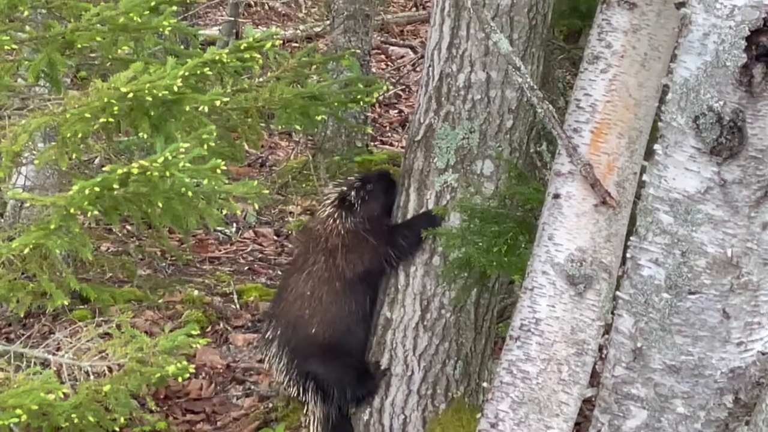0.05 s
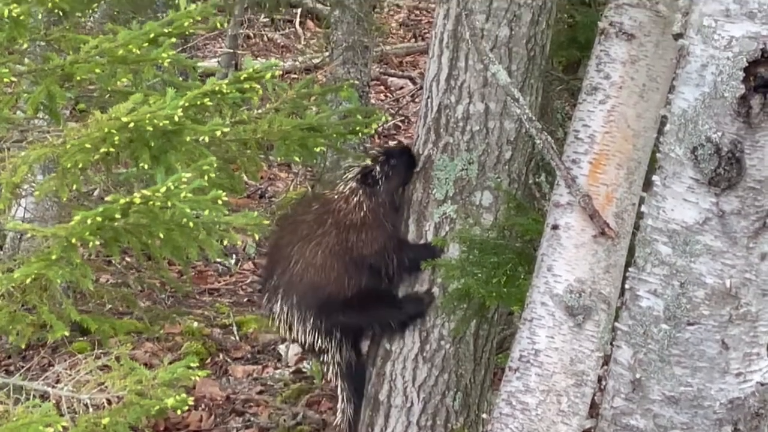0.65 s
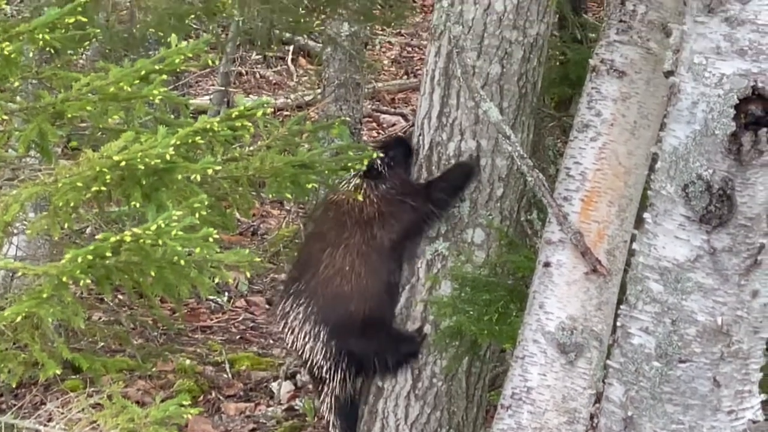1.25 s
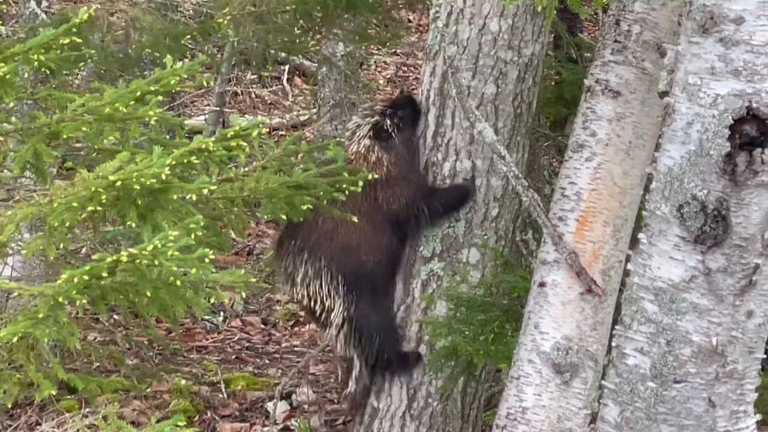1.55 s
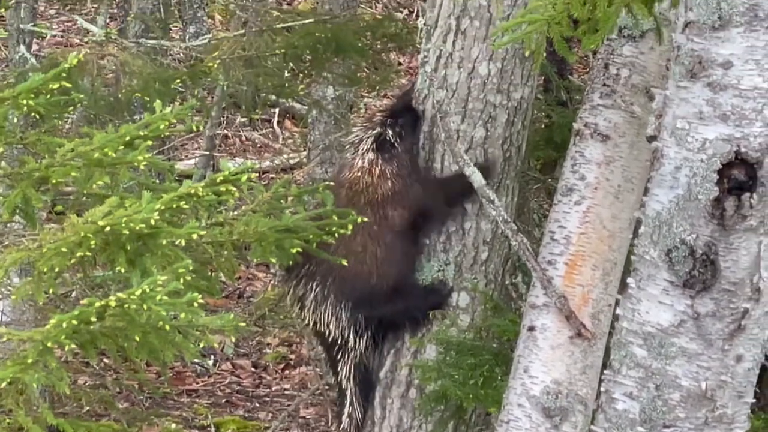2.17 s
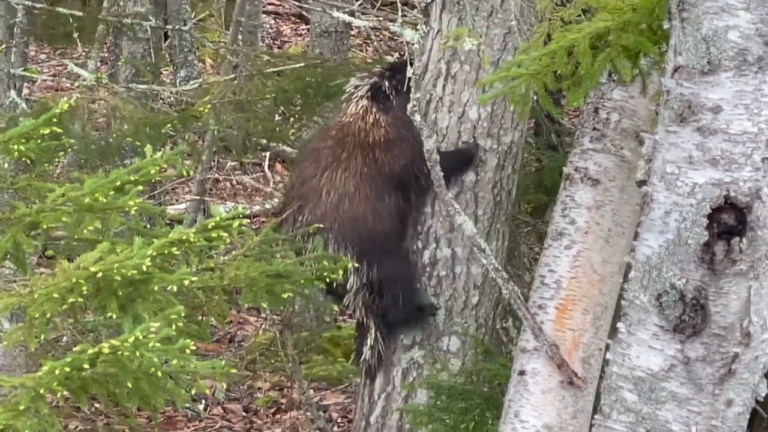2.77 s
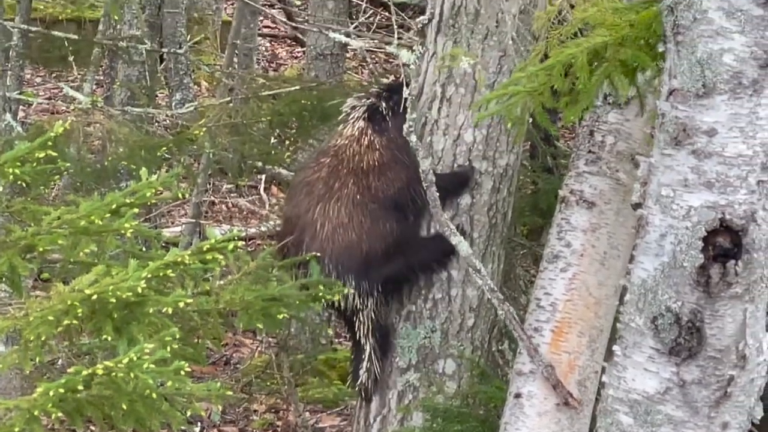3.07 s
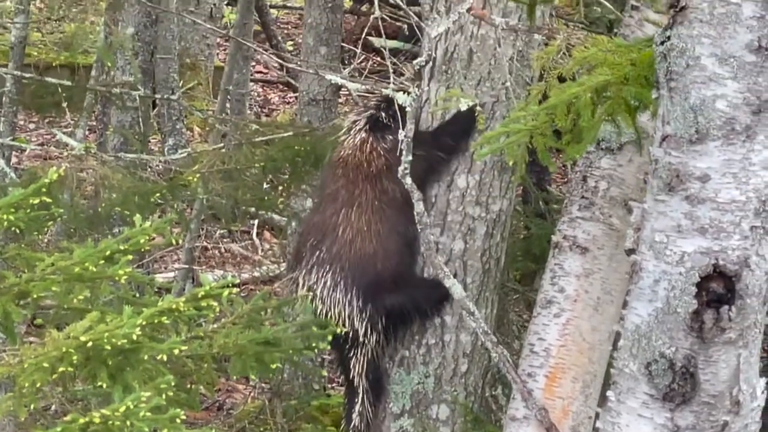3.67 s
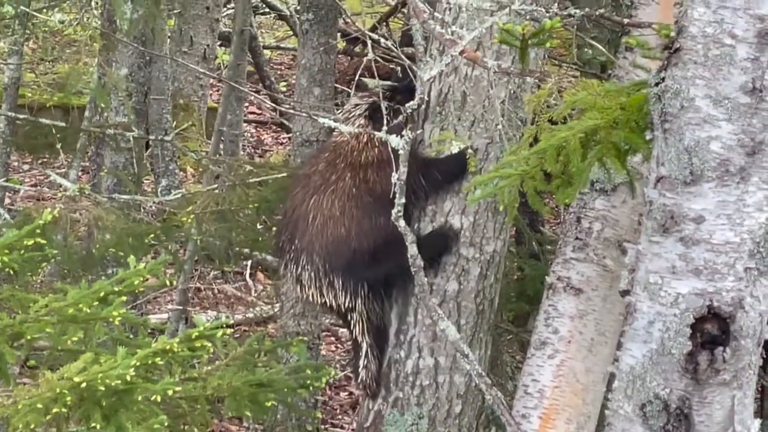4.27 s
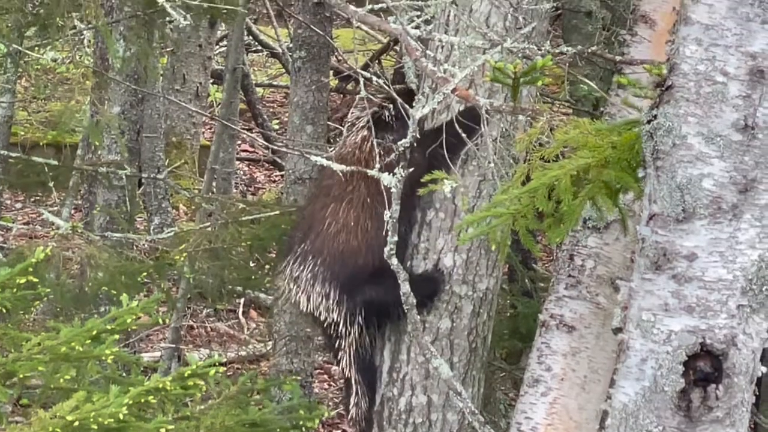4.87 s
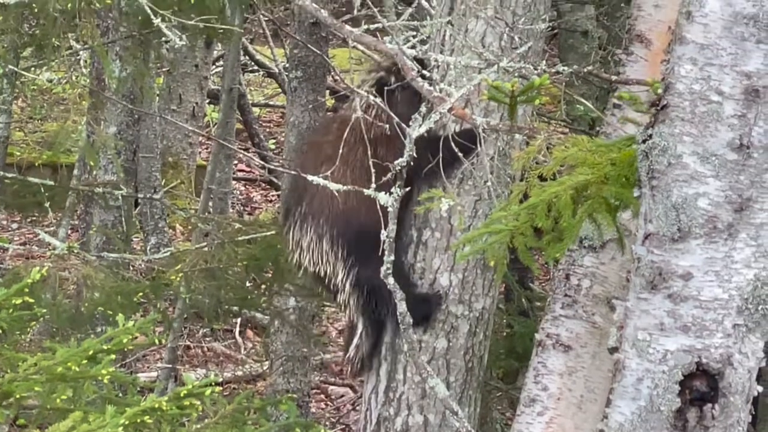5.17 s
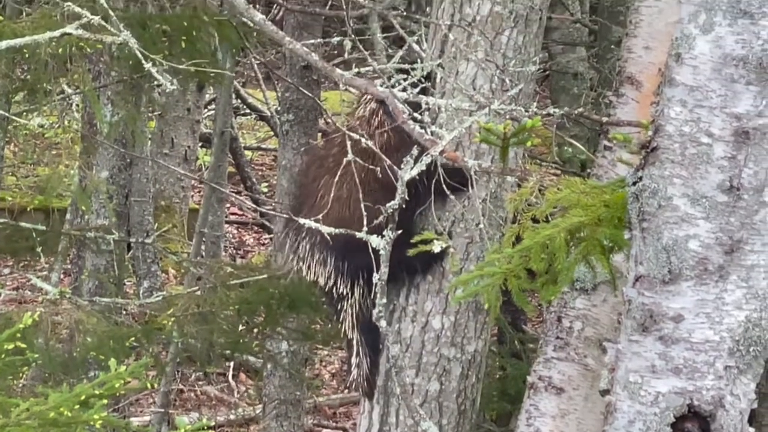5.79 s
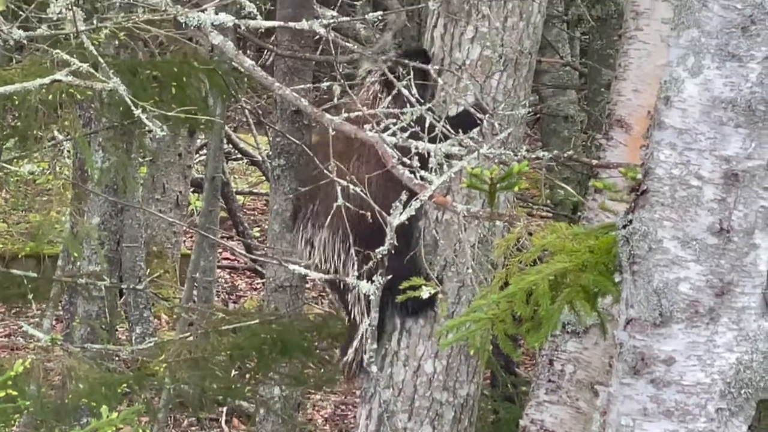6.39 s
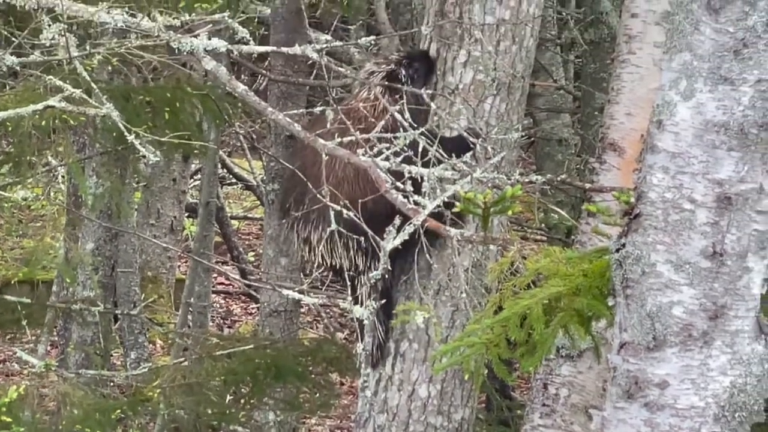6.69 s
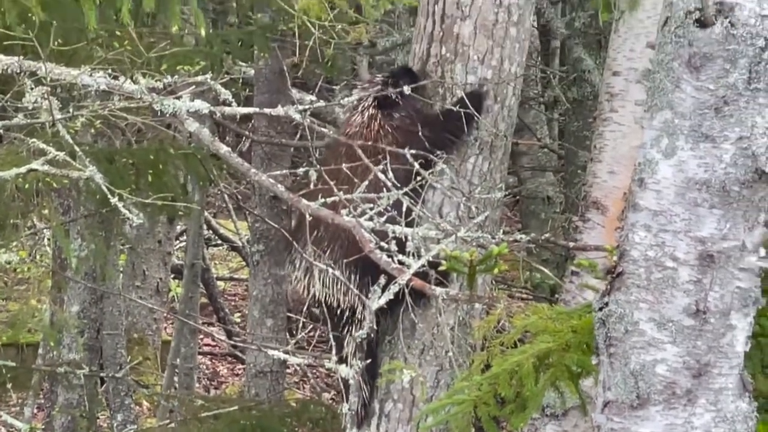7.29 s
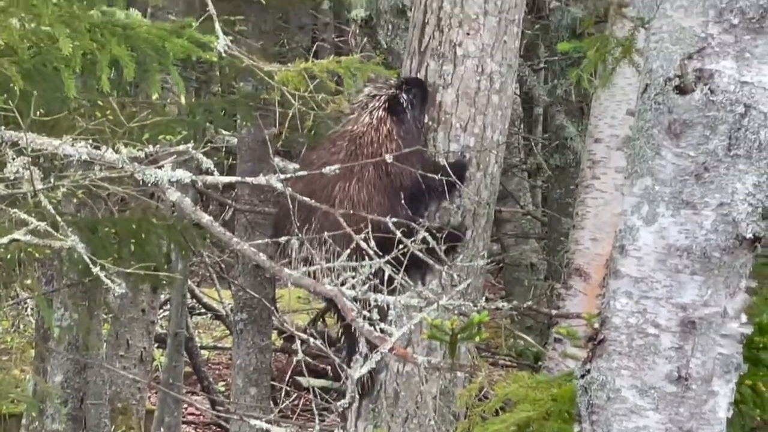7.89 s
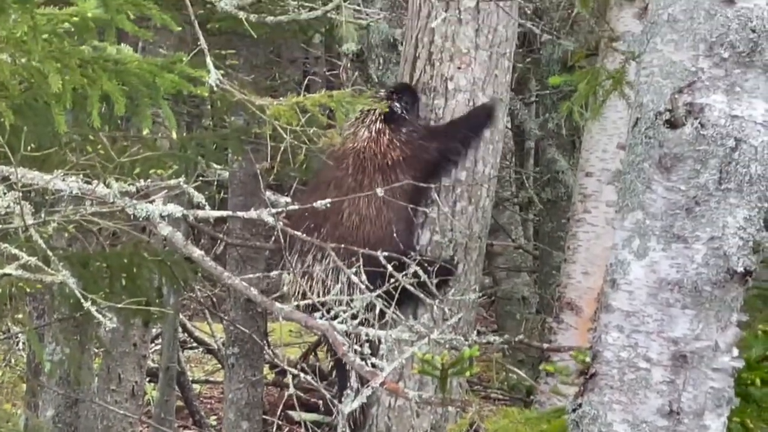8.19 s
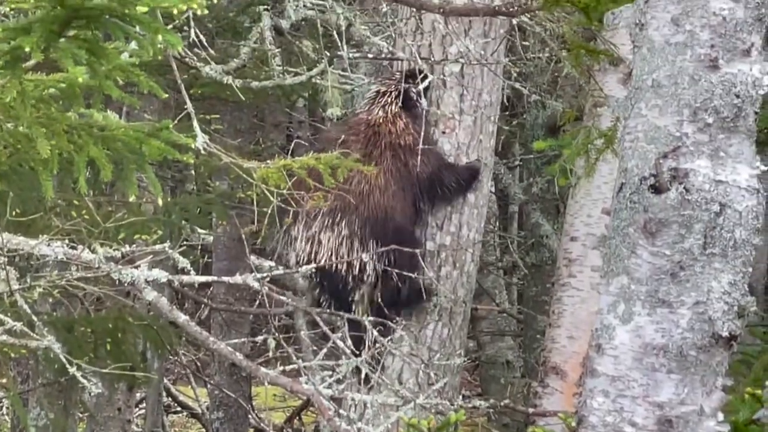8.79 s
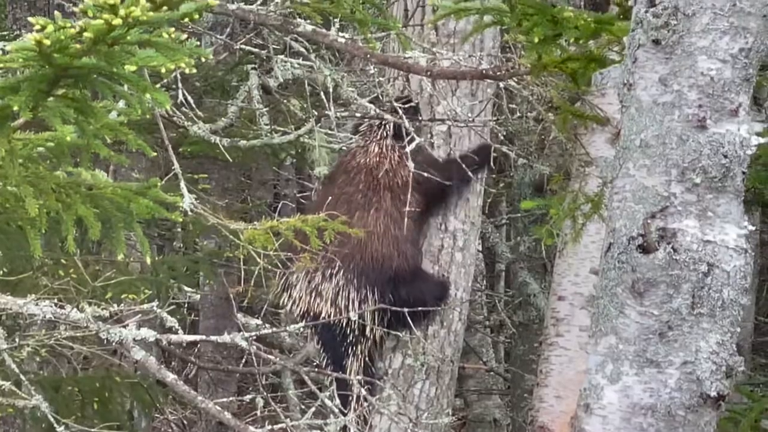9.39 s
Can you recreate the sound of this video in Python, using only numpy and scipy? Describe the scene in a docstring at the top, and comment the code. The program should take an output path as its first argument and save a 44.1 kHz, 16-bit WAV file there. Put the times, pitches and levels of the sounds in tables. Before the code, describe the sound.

Light gusts rumble on the microphone while an animal climbs a trunk with small dry bark cracks, twig ticks and one stick snap.

```python
"""First you hear a soft hiss and the low, fluttering rumble of light gusts on the microphone. Over it a
porcupine climbs a rough trunk: its claws crack off flakes of bark and rake over the ridges, its quills rustle,
and thin dry twigs tick. Late on, a dead stick snaps. The trees scatter each of these climbing sounds into a
short tail, except for the twigs' faintest ticks. The hiss and the rustle grow louder in the second half."""
import sys
import numpy as np
from scipy import signal
from scipy.fft import rfft, irfft
from scipy.io import wavfile
from scipy.ndimage import uniform_filter1d

SR = 44100
rng = np.random.default_rng(int(sys.argv[2]) if len(sys.argv) > 2 else 0)


def wrap_up_sound(samples):
    """Save the sound to the file named by the first command line argument, as 16-bit audio."""
    columns = np.atleast_2d(samples).T
    # keep every value between -1 and 1, then stretch to whole-number steps
    tamed = np.clip(columns, -1, 1)
    steps = np.round(tamed * 32767).astype(np.int16)
    wavfile.write(sys.argv[1], SR, steps)


N = 416744
TIME = np.arange(N) / SR
FREQ = np.fft.rfftfreq(N, 1 / SR)


def undb(db):
    """Turn decibels into a number to multiply by."""
    return 10 ** (np.asarray(db) / 20)


def unit(x):
    """Scale a sound to an average strength (rms) of 1."""
    return x / np.sqrt(np.mean(x ** 2))


def curve(table):
    """Join (time, value) points with straight lines: one value for every sample."""
    return np.interp(TIME, *np.transpose(table))


def gains(points, freq):
    """Read off how much (frequency, level) points boost or cut each given frequency."""
    hz, db = np.transpose(points)
    return undb(np.interp(np.log(freq + 1), np.log(hz), db))


def colour(x, points):
    """Shape a sound's tone to follow (frequency, level) points."""
    cepstrum = irfft(np.log(gains(points, FREQ)), N)
    # folding this in half makes the filter ring after a click, not before it
    cepstrum[1:N // 2] *= 2
    cepstrum[N // 2 + 1:] = 0
    return irfft(rfft(x) * np.exp(rfft(cepstrum)), N)


def add(track, s, sound):
    """Mix a sound into a track, starting at s seconds."""
    start = max(int(s * SR), 0)
    track[..., start:start + sound.shape[-1]] += sound[..., :N - start]


def wander(per_s):
    """A line that drifts at random, usually by about 1 either way."""
    knots = rng.standard_normal(4096)
    return np.interp(TIME * per_s, np.arange(len(knots)), knots) * np.sqrt(3 / 2)


def grains(per_s, spread_db):
    """Tiny clicks at random moments, a few much louder than the rest."""
    clicks = (rng.random(N) < per_s / SR) * rng.choice([-1, 1], N)
    return unit(clicks * undb(spread_db * rng.standard_normal(N).clip(-2, 2)))


# tone of the fine hiss: (frequency [Hz], level [dB])
HISS_TONE = [(150, 15), (500, 8), (1000, 4), (2200, 1.5), (4200, -2.5), (5800, -9), (7200, -3.5),
             (8700, -10), (11000, -9.5), (13000, -8), (15500, -20)]
# tone of far wind in the treetops: (frequency [Hz], level [dB])
TREETOP_TONE = [(70, -14), (200, -32), (450, 0), (700, -2.5), (1100, -9.5), (1800, -21), (4000, -93)]
# how the hiss grows louder; faint ticks follow it, the quills half as much: (time [s], gain [dB])
SWELL = [(3.4, -6.5), (5.3, -4.5), (6.2, -2.5), (7.3, -2), (8, 0.5), (8.8, 0.5)]
def forest(hiss_db=-57, hiss_side_db=-13, treetops_db=-64, treetops_side_db=-4):
    """A hiss that slowly grows louder, and a wide, soft wash of wind in the treetops."""
    out = 0
    for tone, db, side_db in [(HISS_TONE, hiss_db + curve(SWELL), hiss_side_db),
                              (TREETOP_TONE, treetops_db, treetops_side_db)]:
        mid, side = (unit(colour(rng.standard_normal(N), tone)) for _ in range(2))
        side = side * undb(side_db)  # more side makes the sound wider
        out = out + np.array([mid + side, mid - side]) * undb(db)
    return out


def wind(side_db=-10):
    """Air hits the microphone's two openings: mostly both alike, a little in opposite ways."""
    rumble_db, small_db = gust_levels()
    mid = turbulence(rumble_db, small_db) + buffets()
    side = turbulence(rumble_db + side_db, small_db)
    return np.array([mid + side, mid - side])


# light air between gusts, dying away near the end: (time [s], rumble level [dB])
LIGHT_AIR = [(0, -53), (2, -55.5), (4.6, -50.5), (5.4, -54.5), (7, -56.5), (8.5, -66), (9.45, -74)]
# gusts, which may overlap: (start [s], length [s], rumble level [dB], small swirls against rumble [dB])
WIND_GUSTS = [(-0.01, 0.43, -39.5, -33), (0.347, 0.089, -32, -26), (0.547, 0.15, -38.5, -26),
              (0.752, 0.81, -46.5, -13.5), (2.127, 0.43, -42.5, -15.5), (2.572, 0.14, -38, -18),
              (2.762, 0.47, -46.5, -10.5), (3.25, 0.68, -37, -12), (3.723, 0.1, -31.5, -15),
              (3.966, 0.14, -37, -13), (4.445, 0.29, -47.5, -33), (4.963, 0.087, -45, -16),
              (5.237, 0.32, -41, -14.5), (5.296, 0.11, -31.5, -18), (5.729, 0.1, -40, -9.5),
              (5.96, 0.23, -41.5, -14.5), (6.264, 0.36, -42.5, -14.5), (6.416, 0.19, -41.5, -11),
              (7.103, 0.58, -45.5, -13), (7.737, 0.23, -43.5, -8.5), (8.013, 0.36, -48, -11),
              (8.608, 0.3, -58, -11)]
def gust_levels(rise_s=0.034, fall_s=0.048, breeze_swirls_db=-7.5, flutter_per_s=18, flutter_db=2):
    """Gusts swell, hold and fade. Gives the rumble's level and the small swirls' level against it (dB)."""
    rumble = undb(curve(LIGHT_AIR)) ** 2
    small = rumble * undb(breeze_swirls_db) ** 2
    for s, length, db, swirls_db in WIND_GUSTS:
        rise = np.clip((TIME - s) / rise_s, 0, 1)
        fall = np.exp(-np.maximum(TIME - s - length, 0) / fall_s)
        power = (rise * fall * undb(db)) ** 2
        rumble += power
        small += power * undb(swirls_db) ** 2
    flutter = flutter_db * wander(flutter_per_s)  # a gust is never quite steady
    return 10 * np.log10(rumble) + flutter, 10 * np.log10(small / rumble)


def mic_opening(freq, cut_hz=55, lag_hz=280):
    """The microphone's opening loses the deepest bass and delays the lows, so each puff falls in pitch."""
    s = 1j * freq / cut_hz
    bass_cut = s ** 2 / (s ** 2 + s + 1) * s / (s + .5)
    delay = ((lag_hz - 1j * freq) / (lag_hz + 1j * freq)) ** 7
    return bass_cut * delay


# tone of the swirling air in an average gust: (frequency [Hz], level [dB])
GUST_TONE = [(22, -26), (40, -6.5), (65, 5.5), (110, -2.5), (200, -10), (350, -15.5), (550, -23),
             (800, -35.5), (1200, -51)]
def turbulence(rumble_db, small_db, puffs_per_s=75, swirls_per_s=120, usual_db=-12, brisk_db=-50):
    """Broad puffs over finer swirls of one octave each; faster air has more small, high swirls."""
    shape = gains(GUST_TONE, FREQ) * np.exp(1j * np.angle(mic_opening(FREQ)))
    puffs = rfft(grains(puffs_per_s, spread_db=2.5))
    out, plain = 0, 0
    for hz in 25 * 2. ** np.arange(7):
        swirls = undb(-1) * rfft(grains(swirls_per_s, spread_db=4))
        this_octave = np.maximum(1 - abs(np.log2((FREQ + 1) / hz)), 0)
        band = irfft((puffs + swirls) * shape * this_octave, N)
        octaves_up = np.log2(hz / 95)
        lift_db = 0.52 * np.clip(octaves_up, 0, 2) * (small_db - usual_db)
        # only a brisk gust reaches the top octaves
        lift_db += 0.043 * np.clip(octaves_up - 2, 0, 1) * (rumble_db + small_db - brisk_db)
        out = out + band * undb(lift_db)
        plain = plain + band
    # even out chance swings over 92 ms, so that the gusts set the loudness
    strength = np.sqrt(uniform_filter1d(plain ** 2, int(0.092 * SR)) + 1e-18)
    return out * undb(rumble_db) / strength


# single strong swirls of air: (time [s], level [dB], upper edge of the tone [Hz])
STRONG_SWIRLS = [(0.071, -29, 108), (0.384, -29, 227), (0.559, -29.5, 290), (0.682, -23, 162),
                 (0.911, -36, 290), (1.116, -35, 223), (1.265, -36, 360), (1.48, -37.5, 422),
                 (1.519, -38, 300), (2.268, -33, 483), (2.292, -34, 348), (2.402, -30, 173),
                 (2.461, -27, 332), (2.51, -32.5, 300), (2.54, -39, 480), (2.681, -26.5, 265),
                 (3.36, -34.5, 700), (3.422, -35, 714), (3.533, -26.5, 200), (3.577, -33, 603),
                 (3.594, -28.5, 535), (3.65, -30.5, 380), (3.76, -34, 720), (3.815, -32, 810),
                 (4.027, -36, 710), (4.04, -32, 563), (4.145, -27.5, 229), (5.340, -18, 463),
                 (5.378, -27, 645), (5.402, -36, 720), (5.499, -27, 225), (5.723, -30, 440),
                 (5.755, -18, 228), (5.77, -29, 320), (5.781, -28.5, 94), (5.816, -37, 430),
                 (6.12, -34.5, 520), (6.165, -29, 427), (6.48, -28.5, 366), (6.89, -31, 218),
                 (6.924, -43.5, 530), (7.226, -35.5, 387), (7.434, -34.5, 297), (7.51, -31, 343),
                 (7.779, -40, 380), (7.863, -34.5, 340), (7.965, -35.5, 450), (8.17, -29.5, 191),
                 (8.308, -31.5, 286)]
def buffets(gain_db=-1, wake_db=-6, wake_s=0.02, size=4096):
    """A strong swirl is one smooth push of air and a rolling wake; smaller ones sound higher."""
    out, freq = np.zeros(N), np.fft.rfftfreq(size, 1 / SR)
    lead_s, t = size // 8 / SR, np.arange(size) / SR
    for s, db, edge_hz in STRONG_SWIRLS:
        bass_cut = freq ** 2 / (freq ** 2 + (edge_hz / 4) ** 2)
        dulling = np.hypot(1, freq / edge_hz * 2)
        push = bass_cut * np.exp(-(freq / edge_hz) ** 2) / dulling * mic_opening(freq)
        push *= np.exp(-2j * np.pi * freq * lead_s)  # leave room for the push to build up
        wake = rng.standard_normal(size) * np.sqrt(t) * np.exp(-t / wake_s)
        rolling = undb(wake_db) * rfft(wake / np.linalg.norm(wake)) / dulling
        thump = irfft(push * (1 + rolling)) / abs(irfft(push)).max()
        add(out, s - lead_s, thump * undb(db + gain_db))
    return out


def effort_db(reach_s=0.98, most_db=2.5):
    """Extra loudness while the animal hauls its body up, around each rake of a paw."""
    pulls = sum(np.exp(-((TIME - s) / reach_s) ** 2) for s, *_ in PAW_RAKES)
    return most_db * np.minimum(pulls, 1)


# tone given off by a flake of bark: (frequency [Hz], level [dB])
BARK_TONE = [(500, 50), (1600, 7), (2600, 6), (4200, 1), (5500, 1), (7500, -11), (10000, -14), (13500, -19),
             (16000, -45)]
def quills(base_db=-74, flicks_per_pitch_per_s=8, ring_s=0.0005, size=256):
    """Quills and tail flick small scales of bark all the way up, each with a dry, woody click."""
    t, out = np.arange(size) / SR, 0
    for hz in np.geomspace(1800, 6800, 9):
        click = np.sin(2 * np.pi * hz * t) * np.exp(-t / ring_s) * gains(BARK_TONE, hz)
        out = out + signal.fftconvolve(grains(flicks_per_pitch_per_s, spread_db=9), click)[:N]
    return unit(out) * undb(base_db + effort_db() + curve(SWELL) / 2)


def flake(x, hz, octaves):
    """A flake rings in a band, octaves wide, around its own pitch, with a hint of the bark's tone."""
    freq = np.fft.rfftfreq(len(x), 1 / SR)
    off_pitch = np.hypot(1, 2 * np.log2((freq + 1) / hz) / octaves)
    return irfft(rfft(x) * gains(BARK_TONE, freq) ** 0.23 / off_pitch, len(x))


def trees(x, echo_db=-10, fade_60db_s=0.27, width=0.18, build_s=0.00064, size=16384):
    """Trunks and branches scatter a sound into a short, blurred tail, different from every spot."""
    t = np.arange(size) / SR
    envelope = np.exp(-np.log(1000) * t / fade_60db_s) * (1 - np.exp(-t / build_s))
    tails = rng.standard_normal((2, size)) * envelope
    mid, side = (signal.fftconvolve(x, tail / np.linalg.norm(tail)) for tail in tails)
    return np.pad(x, (0, size - 1)) + undb(echo_db) * np.array([mid + width * side, mid - width * side])


# claws breaking off flakes of bark: (time [s], level [dB], pitch [Hz])
CLAW_CRACKS = [(0.0064, -37.5, 4360), (0.3147, -42.5, 1790), (0.322, -45, 2210), (0.844, -50.5, 5340),
               (1.139, -41.5, 3200), (1.2254, -44, 5170), (1.4207, -49, 4870), (1.5433, -40, 3900),
               (2.1009, -41.5, 4280), (2.2925, -44.5, 4200), (2.3075, -38, 3860), (2.3174, -43, 3820),
               (2.332, -41, 3600), (2.3489, -35.5, 4600), (3.09, -47.5, 2780), (3.2031, -41.5, 3900),
               (3.4205, -47, 3600), (3.471, -47.5, 3900), (3.6194, -40.5, 5470), (3.862, -38.5, 4530),
               (3.8714, -43, 3900), (3.883, -37.5, 3950), (3.9914, -38, 4200), (4.0029, -34.5, 3900),
               (4.2648, -48, 3300), (4.435, -47.5, 4260), (4.5259, -37.5, 4370), (4.573, -36.5, 4860),
               (4.5843, -43, 3550), (4.8129, -42.5, 2830), (4.863, -45, 4640), (5.1736, -39, 6350),
               (5.725, -43, 4600), (5.741, -42, 4860), (5.942, -45, 4600), (6.0856, -40.5, 4040),
               (6.1885, -43.5, 5060), (6.314, -42.5, 5200), (6.8405, -44.5, 4210), (7.0265, -38, 4300),
               (7.9792, -45.5, 3130), (8.054, -42, 5700), (8.3413, -40.5, 3700), (8.707, -35.5, 4100),
               (9.125, -42.5, 3000), (9.2272, -38.5, 4200)]
def cracks(ring_s=0.0011, crumb_db=-21, crumb_s=0.018, crumb_chance=0.035, gain_db=13, size=2048):
    """A flake snaps and rings for a millisecond or two; crumbs of all sizes break off just after."""
    out, t = np.zeros((2, N)), np.arange(size) / SR
    for s, db, hz in CLAW_CRACKS:
        snap = rng.standard_normal(size) * np.sqrt(2 * t / ring_s) * np.exp(-t / ring_s)
        crumbs = rng.standard_normal(size) * (rng.random(size) < crumb_chance)
        crumbs *= np.exp(-t / crumb_s) / np.sqrt(crumb_chance)
        crack = flake(np.roll(snap, size // 128), hz, octaves=0.26)
        crack += undb(crumb_db) * flake(crumbs, hz, octaves=1.36)
        add(out, s, trees(crack / np.linalg.norm(crack) * undb(db + gain_db)))
    return out


# paws raking over the bark: (middle time [s], length [s], level [dB], pitch [Hz])
PAW_RAKES = [(1.146, 0.038, -61.5, 3000), (2.332, 0.03, -64, 4330), (3.183, 0.058, -65.5, 3320),
             (3.6, 0.045, -60, 5000), (3.9, 0.044, -59, 4770), (4.669, 0.015, -61, 3300),
             (4.845, 0.093, -67.5, 4130), (6.078, 0.12, -62, 3150), (6.701, 0.26, -73, 3030),
             (7.197, 0.1, -63, 4400), (8.383, 0.069, -58.5, 4170)]
def rakes(catches_per_s=95, spread_octaves=0.65, size=16384):
    """Sliding claws catch unevenly on five ridges, each with its pitch, as the paw presses and lets go."""
    out, t = np.zeros(N), (np.arange(size) - size // 2) / SR
    ridges = [(grains(catches_per_s, spread_db=5), 2 ** octave)
              for octave in spread_octaves * np.linspace(-1, 1, 5)]
    for k, (s, length, db, hz) in enumerate(PAW_RAKES):
        press = np.exp(-2 * (t / length) ** 2)
        part = slice(k * size, (k + 1) * size)  # fresh catches for every rake
        rasp = press * sum(flake(catches[part], hz * ratio, octaves=0.38) for catches, ratio in ridges)
        add(out, s + t[0], rasp * np.linalg.norm(press) / np.linalg.norm(rasp) * undb(db))
    return out


def thin(x, body_db):
    """Set a tick's body (below 5 kHz) against its top (above 10 kHz); the thinnest twigs have least."""
    freq = np.fft.rfftfreq(len(x), 1 / SR)
    return irfft(rfft(x) * gains([(5000, body_db), (10000, 0)], freq), len(x))


# tone given off by a thin twig: (frequency [Hz], level [dB])
TWIG_TONE = [(400, -22), (1200, 2), (2500, 0.5), (5500, 2), (9000, 6.5), (11000, -3), (13000, 2),
             (16000, -8)]
# dry twigs ticking: (time [s], level [dB], body against top [dB])
TWIG_TICKS = [(1.4881, -37, -8), (1.544, -46.5, -9), (1.955, -43.5, -8), (3.863, -40, -10.5),
              (4.5225, -39, -12), (4.571, -49, -16), (5.88, -39, -37), (6.0721, -45, -6),
              (6.9138, -46.5, -5), (7.4885, -39, -11), (7.7275, -36, -12), (7.7716, -44, -6),
              (7.897, -40, -3), (8.0546, -38.5, -8), (8.2247, -42.5, -18), (8.905, -44, -16)]
def ticks(ring_s=0.00056, gain_db=14, body_lift_db=6, strays_per_s=10, stray_db=-73.75, size=256):
    """Thin twigs give short, bright ticks; faint strays fall at random, louder as the animal pulls."""
    out, t = np.zeros((2, N)), np.arange(size) / SR
    for s, db, body_db in TWIG_TICKS:
        tick = rng.standard_normal(size) * np.sqrt(t) * np.exp(-t / ring_s)
        tick = np.pad(tick, (size // 16, size - size // 16))
        tick = thin(tick / np.linalg.norm(tick), body_db + body_lift_db)
        add(out, s, trees(tick * undb(db + gain_db)))
    strays = thin(grains(strays_per_s, spread_db=8), body_db=-15)
    return colour(out + strays * undb(stray_db + effort_db() + curve(SWELL)), TWIG_TONE)


# notes at which the dead stick rings as it bends: (pitch [Hz], level [dB])
STICK_NOTES = [(2100, -16), (2650, -13), (3700, -8), (4850, -3)]
def stick(snap_s=7.4888, tear_s=0.0012, ring_octaves=0.11, energy_db=-20, size=1024):
    """A dead stick gives way: its fibres tear in a short burst that sets it ringing."""
    out, t = np.zeros((2, N)), np.arange(size) / SR
    fibres = np.roll(rng.standard_normal(size) * np.exp(-t / tear_s), size // 32)
    # filtering twice makes each note purer
    ring = sum(undb(db) * flake(flake(fibres, hz, ring_octaves), hz, ring_octaves)
               for hz, db in STICK_NOTES)
    add(out, snap_s, trees(ring / np.linalg.norm(ring) * undb(energy_db)))
    return out


def scene():
    """The climber among the trees, the forest behind, the wind on the microphone."""
    rubbing = trees(rakes() + quills(), echo_db=-4)[:, :N]
    return cracks() + stick() + ticks() + rubbing + forest() + wind()


def record(dry, ring_hz=8800, ring_width_hz=1500, top_hz=16100):
    """The microphone's left opening rings, slightly delaying the treble; the very top is cut off."""
    phase_turn = np.exp(-2j * np.pi / (1 + np.exp((ring_hz - FREQ) / ring_width_hz)))
    left = irfft(rfft(dry[0]) * phase_turn, N)
    top_cut = signal.ellip(8, .2, 70, top_hz, fs=SR, output="sos")
    return signal.sosfilt(top_cut, np.array([left, dry[1]]))


dry = scene()
out = record(dry)
wrap_up_sound(out)
```